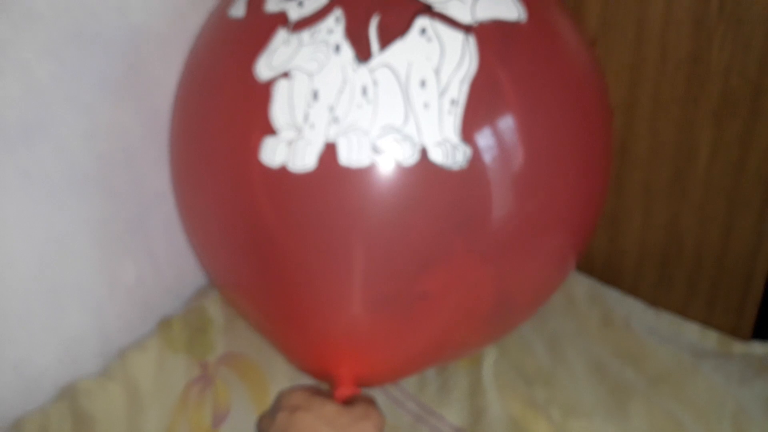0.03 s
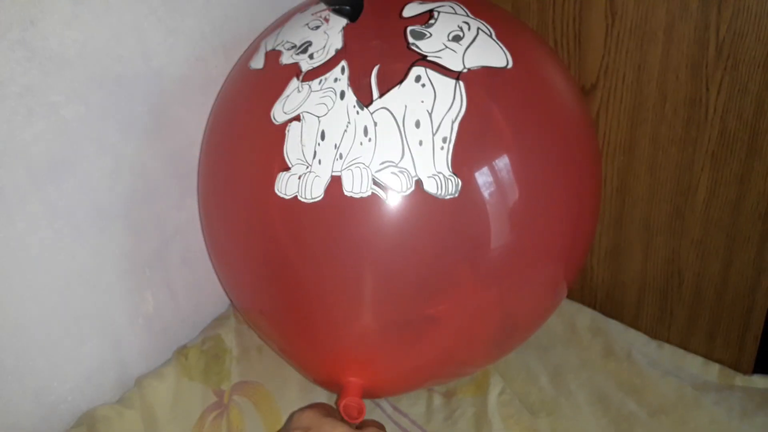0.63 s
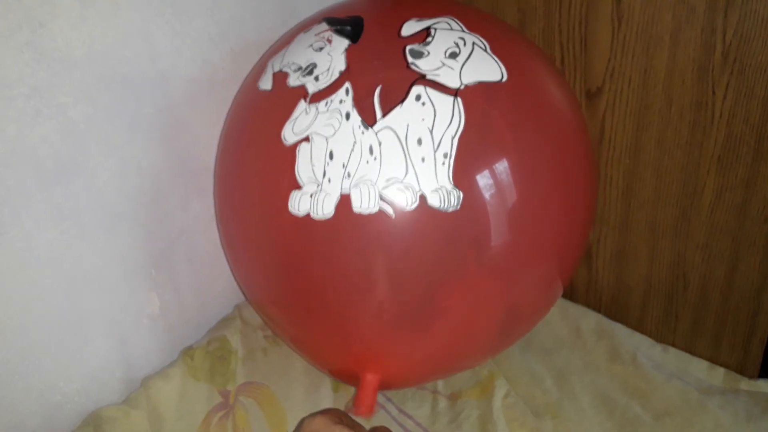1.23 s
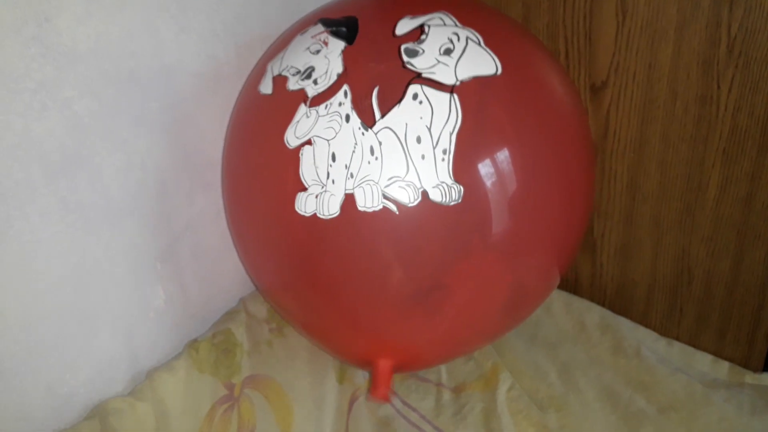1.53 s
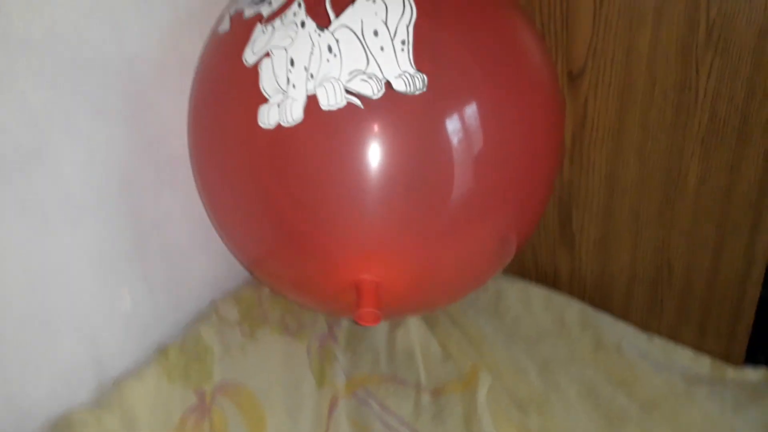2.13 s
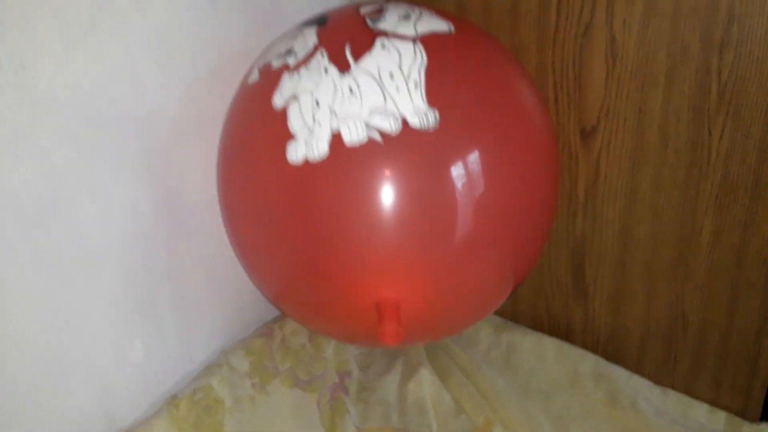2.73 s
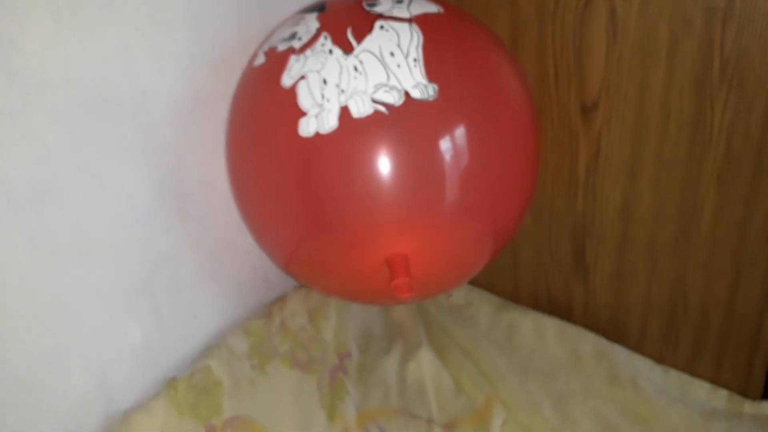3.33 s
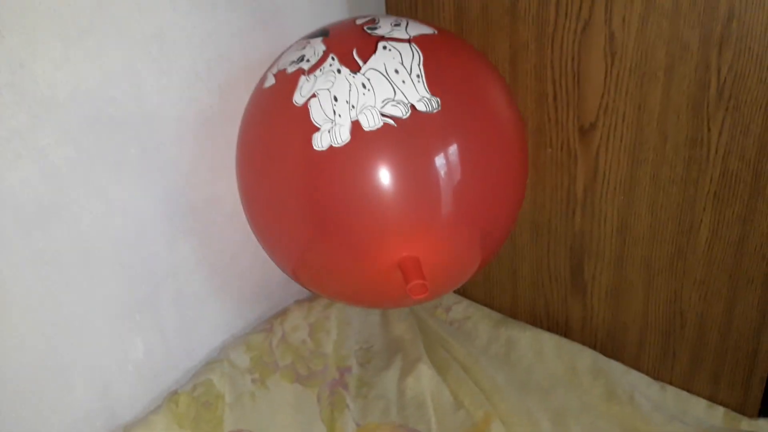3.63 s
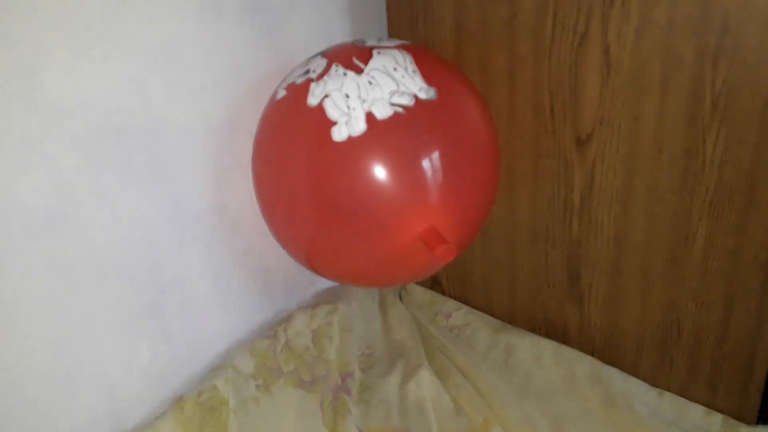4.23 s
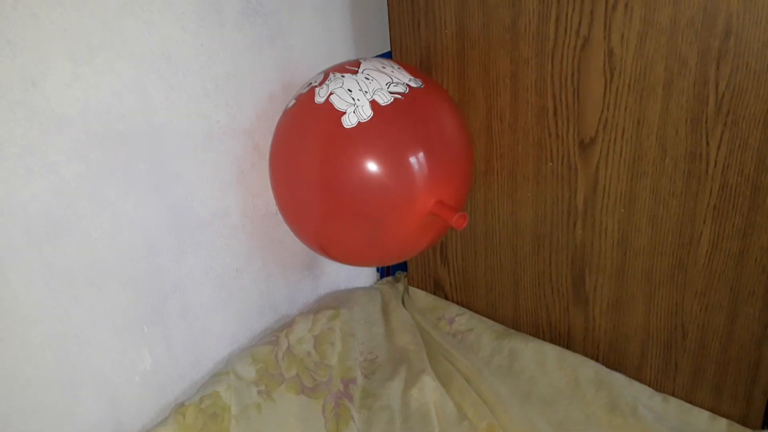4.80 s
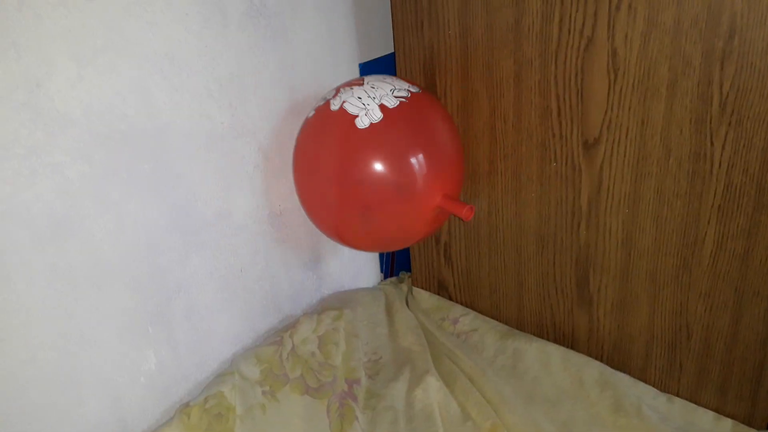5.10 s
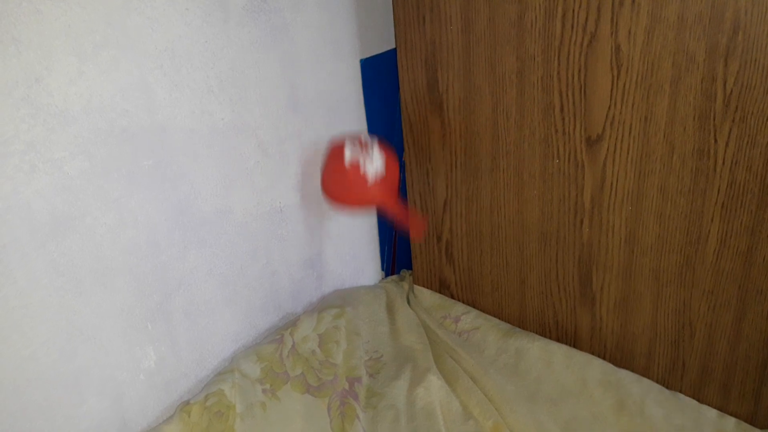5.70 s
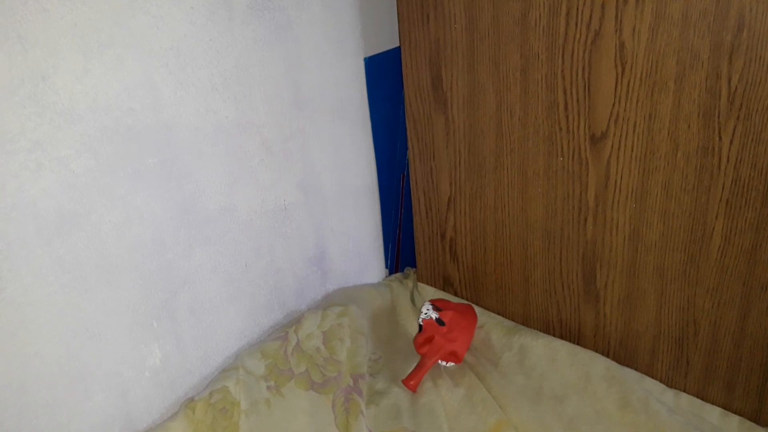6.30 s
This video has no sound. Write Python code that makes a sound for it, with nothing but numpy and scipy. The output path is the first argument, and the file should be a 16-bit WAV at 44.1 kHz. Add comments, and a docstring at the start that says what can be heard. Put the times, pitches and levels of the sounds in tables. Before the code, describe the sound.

A deflating balloon hisses, sputters with a low, booming flutter, then leaks softly and lands with a faint thump in a quiet room.

```python
"""A rubber balloon empties in the corner of a small, quiet room.
Air hisses through the pinched neck over low eddies, with a faint whistle off the lip now and then.
Let go at 0.9 s, the neck flaps, slaps and roars, shaking a boom out of the taut skin.
From 2.2 s it hangs slack and settles to a soft hiss. Near 5.7 s the last air leaves in a short
rush and a low puff, and the limp skin flops onto a bed."""
import sys
import numpy as np
from scipy import signal
from scipy.fft import rfft, irfft, next_fast_len
from scipy.io import wavfile
from scipy.ndimage import uniform_filter1d

SR = 44100
rng = np.random.default_rng(int(sys.argv[2]) if len(sys.argv) > 2 else 0)


def to_wav(s):
    """Save 16-bit WAV."""
    ch = np.atleast_2d(s).T  # columns
    pcm = np.round(np.clip(ch, -1, 1) * 32767)  # PCM
    wavfile.write(sys.argv[1], SR, pcm.astype(np.int16))


N = 288855

LET_GO_S, SETTLE_S, EMPTY_S = 0.916, 2.177, 5.65   # the neck starts to flap, goes slack, runs out of air
ATTACK_S, RELEASE_DB_PER_S = .025, 220   # how a stage of the flow sets in and dies

# Table levels are relative: each layer sets its own gain.
# broad rush of the tight jet: f/Hz, level/dB
RUSH_COLOUR = [(100, -13.5), (220, 2.5), (305, 7.5), (490, 0.5), (650, 2.5), (870, -0.5), (1130, -1),
               (1400, -2.5), (1750, -2.5), (2100, 0), (2450, 0.5), (3200, -4.5), (5000, -12.5), (9000, -30)]
# fine treble spray of the tight jet: f/Hz, level/dB
TIGHT_SPRAY_COLOUR = [(3000, -23), (5000, -1), (5700, -1), (6500, -1.5), (7600, 2.5), (8400, 3.5),
                      (9200, -3), (10200, -11.5), (12000, -12), (13800, -12), (16000, -17)]
# resonance of the pinched opening, sinking as the grip loosens: t/s, f/Hz
OPENING_GLIDE = [(.2, 2680), (.85, 2010), (1.05, 2330), (2.2, 2070)]
# resonance of the neck, sinking as the rubber relaxes: t/s, f/Hz
NECK_GLIDE = [(1.2, 4280), (2.0, 4040), (2.35, 3790), (5.2, 3604), (5.7, 3376)]
# the pinched neck's ring, weakening as the grip loosens: t/s, level/dB
PINCHED_RING_FADE = [(0, -32), (.27, -31.5), (.52, -39.5), (.92, -39.5)]
# eddies buffeting the skin by the pinched neck: f/Hz, level/dB
EDDY_COLOUR = [(25, -25), (55, -7.5), (90, -3), (130, -5), (200, -6.5), (400, -31)]
# gusts in the eddies and the draught: middle t/s, length/s, boost/dB
EDDY_GUSTS = [(.12, 0.069, 7), (.42, .07, 4.5), (2.33, .16, 6.5), (2.85, 0.12, 4.5), (3.52, 0.16, 5),
              (3.98, 0.42, 8), (5.68, 0.23, 11.5)]
# reflections from the corner and the room: delay/s, level/dB
WALL_ECHOES = [(.0031, -25.5), (.0053, -23), (.0089, -14.5), (0.0137, -17.5), (0.019, -15), (0.0264, -14.5),
               (0.0343, -26), (.0471, -25.5)]
# room tone, mostly lows: f/Hz, level/dB
ROOM_COLOUR = [(15, -53), (25, -21.5), (53, -8.5), (87, -2.5), (108, -2), (123, -6.5), (263, -16),
               (1160, -25), (7310, -35), (14800, -35.5), (16000, -41.5)]
# brief whistles of the lip: middle t/s, length/s, f/Hz, level/dB
LIP_WHISTLES = [(0.337, .11, 4340, -49), (0.839, 0.078, 2016, -38.5), (2.874, 0.079, 3724, -46.5),
                (3.036, .072, 3690, -48), (4.423, 0.064, 3770, -48), (4.528, .06, 3760, -46),
                (4.798, 0.1, 4110, -49), (5.67, 0.075, 4550, -59), (5.714, 0.063, 3250, -68)]
# how fast the free neck flaps: t/s, rate/Hz
FLAP_TEMPO = [(.93, 24.4), (1.53, 24.4), (1.62, 18.5), (1.74, 22), (1.88, 25), (1.94, 16), (2.18, 21)]
# how hard it flaps: t/s, level/dB
FLAP_VIGOUR = [(.93, 1), (1.25, -4), (1.57, -10.5), (2.2, -15.5)]
# surges of the jet through the flapping neck: middle t/s, length/s, boost/dB
JET_SURGES = [(1.595, .05, 4), (2.02, .08, 5)]
# hollow note of the taut skin, sinking as it slackens: t/s, f/Hz
BOOM_GLIDE = [(1.35, 250.5), (2.2, 220)]
# low body around that note: f/Hz, level/dB
BOOM_COLOUR = [(40, -29), (85, -8), (130, -3.5), (175, 5.5), (250, 4.5), (300, -5), (360, -14.5),
               (500, -10), (620, -15.5), (900, -31.5)]
# throbs and dips of the boom: middle t/s, length/s, boost/dB
BOOM_THROBS = [(.99, 0.059, 4), (1.168, 0.027, -6.5), (1.195, 0.013, 6), (1.27, 0.027, -5),
               (1.32, 0.058, 7), (1.383, .014, 3), (1.41, 0.029, -7), (1.455, .06, 3.5), (1.645, 0.022, -9),
               (1.744, 0.017, 6.5), (1.78, .04, 4.5), (1.925, 0.015, 4), (2.097, .025, -10),
               (2.195, .025, 5.5)]
# midrange rasp of the flapping neck: f/Hz, level/dB
RASP_COLOUR = [(300, -17), (450, -5), (620, -5.5), (790, 4), (1000, 4), (1220, -1.5), (1380, -11),
               (2000, -25), (4000, -46)]
# the neck's hardest slaps: t/s, level/dB
NECK_SLAPS = [(1.091, -14.5), (1.131, -17.5), (1.172, -15), (1.213, -20.5), (1.257, -14.5), (1.339, -17),
              (1.376, -19.5), (1.458, -19), (1.696, -27), (1.738, -28), (1.866, -24), (1.907, -27),
              (2.125, -30)]
# rubbery smack of a slap: f/Hz, level/dB
SMACK_COLOUR = [(400, -19.5), (620, -9), (800, 1), (1000, -0.5), (1200, -2.5), (1340, -11), (2000, -28.5)]
# bright spurt of air at a slap: f/Hz, level/dB
SPIT_COLOUR = [(1500, 5.5), (8000, 4.0), (11000, -3.5), (16000, -0.5)]
# envelope of the hiss through the relaxed neck: t/s, level/dB
SLACK_HISS_LEVEL = [(2.35, -45.5), (2.42, -46), (3.79, -51.5), (4.5, -50), (4.52, -47.5), (4.57, -48),
                    (5.25, -48.5), (5.55, -54)]
# tone of that hiss: f/Hz, level/dB
SLACK_HISS_COLOUR = [(300, -13), (580, -20), (800, -3.5), (980, -7.5), (1200, -20), (1550, -15.5),
                     (2100, -4.5), (2700, -2.5), (4200, 2.5), (5200, -4), (6600, -2), (8400, -4.5),
                     (10000, -18.5), (16000, -27)]
# narrow, half-whistled note of the lip: t/s, f/Hz
LIP_GLIDE = [(2.45, 4024), (3.1, 3600), (4.1, 3456), (4.55, 3690), (5.7, 3360)]
# broad spray of the slack jet, dipping, then growing as the balloon shrinks: t/s, level/dB
SLACK_SPRAY_LEVEL = [(2.4, -64.5), (3.36, -72.5), (4.65, -68), (4.97, -62.5), (5.49, -61.5), (5.64, -58)]
# tone of that spray: f/Hz, level/dB
SLACK_SPRAY_COLOUR = [(200, -14), (500, 4), (780, 14.5), (1000, 11), (1250, 5.5), (1900, 11), (3000, 11.5),
                      (5500, 9), (8300, 6), (10000, 1), (13500, 1.5), (16000, -4.5)]
# low breath of the draught and the last puff: f/Hz, level/dB
BREATH_COLOUR = [(25, -26), (55, -2.5), (110, 2), (220, -4), (330, -4), (450, -10.5), (650, -20.5),
                 (1200, -21)]
# folds of the empty skin landing: t/s, level/dB, crispness/dB, thud/dB
FOLD_HITS = [(5.899, -62, 12, -8), (5.91, -59, 0, 2), (5.919, -51.5, 3, 7), (5.927, -54, 9, 3),
             (5.948, -53, -3, 0), (5.961, -49.5, -14, -8), (5.973, -54, -16, -8), (6.011, -65, -15, -3),
             (6.034, -60, -16, -2)]
# modes of the limp skin: f/Hz, width/Hz, level/dB
SKIN_MODES = [(171.6, 77, -2), (310, 130, 2), (473, 60, -12), (700, 106, -8), (878, 210, -3),
              (1094, 110, -5.5), (2500, 280, -20.5), (8100, 1600, -25)]


def from_db(db):
    """Decibels to gain."""
    return 10 ** (np.asarray(db) / 20)


def rms_one(x):
    """Scale to unit power."""
    return x / np.sqrt(np.mean(x ** 2) + 1e-20)


def clock():
    """Time of each sample in seconds."""
    return np.arange(N) / SR


def curve(rows):
    """Breakpoints (t/s, value) joined by straight lines."""
    return np.interp(clock(), *np.transpose(rows))


def stage(start_s, end_s, release_db_per_s=RELEASE_DB_PER_S):
    """Attack, hold and release of one stage of the flow."""
    attack = np.clip((clock() - start_s) / ATTACK_S, 0, 1)
    return attack * from_db(-release_db_per_s * np.maximum(clock() - end_s, 0)) + 1e-12


def swell(middle_s, length_s):
    """A smooth rise and fall of height 1."""
    return np.exp(-np.minimum((2 * (clock() - middle_s) / length_s) ** 2, 50))


def gain_ride(rows):
    """Unity gain with a swell or dip for each row (middle t/s, length/s, boost/dB)."""
    return from_db(sum(db * swell(s, length_s) for s, length_s, db in rows))


def bursts(times, levels_db, rise_s, decay_s):
    """Envelope of short hits whose powers add."""
    power, age = np.zeros(N), clock()
    shape = (1 - np.exp(-age / rise_s)) * np.exp(-np.minimum(age / decay_s, 50))
    for s, db in zip(times, levels_db):
        at = int(s * SR)
        power[at:] += (from_db(db) * shape[:N - at] / shape.max()) ** 2
    return np.sqrt(power)


def noise(colour):
    """Noise shaped by rows (f/Hz, level/dB), rolling off beyond both ends; rms 1."""
    hz, db = np.transpose(colour)
    size = next_fast_len(N)
    f = np.maximum(np.fft.rfftfreq(size, 1 / SR), 1)
    eq = from_db(np.interp(np.log(f), np.log(hz), db))
    roll_off = np.minimum(f / hz[0], 1) ** 2 * np.minimum(hz[-1] / f, 1) ** 2
    return rms_one(irfft(rfft(rng.standard_normal(size)) * eq * roll_off, size)[:N])


def drift(rate_hz):
    """Smooth random modulation, mostly slower than `rate_hz`; rms 1."""
    hop = 40
    pole = np.exp(-2 * np.pi * rate_hz * hop / SR)
    slow = signal.lfilter([1], [1, -2 * pole, pole * pole], rng.standard_normal(N // hop + 502))[500:]
    return np.interp(np.arange(N) / hop, np.arange(len(slow)), rms_one(slow))


def resonator(hz, width_hz):
    """Coefficients of a two-pole resonance with unity peak gain."""
    r = np.exp(-np.pi * width_hz / SR)
    return (1 - r * r) / 2 * np.array([1, 0, -1]), [1, -2 * r * np.cos(2 * np.pi * hz / SR), r * r]


def gliding_ring(glide, width_hz, block=512):
    """Turbulence rings a resonance whose pitch follows rows (t/s, f/Hz); rms 1."""
    x, state = rng.standard_normal(N), np.zeros(4)
    s, hz = np.transpose(glide)
    for i in range(0, N, block):
        b, a = resonator(np.interp(i / SR, s, hz), width_hz)
        b, a = np.convolve(b, b), np.convolve(a, a)   # twice, for steep sides
        x[i:i + block], state = signal.lfilter(b, a, x[i:i + block], zi=state)
    return rms_one(x)


def wavering_sine(hz, waver_hz):
    """A tone whose pitch wanders at random; rms 1."""
    return np.sqrt(2) * np.sin(2 * np.pi * np.cumsum(hz + waver_hz * drift(44.5)) / SR)


def firm(x, samples):
    """A steadily driven vibration: its level is evened out over a short window."""
    return x / np.sqrt(uniform_filter1d(x ** 2, size=samples) + 1e-12)


def flap_envelope(db, follow, release_db_per_s=RELEASE_DB_PER_S):
    """Open while the neck flaps; the level takes the share `follow` of the vigour's dB."""
    return stage(LET_GO_S, SETTLE_S, release_db_per_s) * from_db(db + follow * curve(FLAP_VIGOUR))


def flap_tremolo(depth_db, lag_turns):
    """The free neck whips to and fro, sweeping its jet past once a flap."""
    start_s, end_s = FLAP_TEMPO[0][0], FLAP_TEMPO[-1][0]
    turns = np.cumsum(curve(FLAP_TEMPO) * (clock() > start_s)) / SR
    free = np.interp(clock(), [start_s - .02, start_s, end_s + .02, end_s + .05], [0, 1, 1, 0])
    depth = free * depth_db * np.log(10) / 20
    return np.exp(depth * np.cos(2 * np.pi * (turns - lag_turns))) / np.sqrt(1 + depth ** 2)


def tight_jet():
    """Air forced through the stretched neck, pinched and then free: rush, two rings and treble spray."""
    pinched = stage(-ATTACK_S, LET_GO_S)
    onset_db = 7.5 * np.exp(-clock() / .025)
    rush_level = np.hypot(pinched * from_db(-35 + onset_db), flap_envelope(-28, follow=.63))
    surging = flap_envelope(-30.5, follow=.3) * gain_ride(JET_SURGES)
    ring_level = np.hypot(pinched * from_db(curve(PINCHED_RING_FADE)), surging)
    spray_level = np.hypot(pinched * from_db(-31 - 10 * clock()), flap_envelope(-37, follow=.23))
    rush = from_db(2.5) * noise(RUSH_COLOUR) + from_db(-12) * gliding_ring(OPENING_GLIDE, width_hz=370)
    ring = from_db(1) * gliding_ring(NECK_GLIDE, width_hz=1300)
    body = (rush_level * rush + ring_level * ring) * flap_tremolo(depth_db=.75, lag_turns=.033)
    spray = spray_level * noise(TIGHT_SPRAY_COLOUR) * flap_tremolo(depth_db=1.27, lag_turns=.018)
    return (body + spray) * from_db(.87 * drift(50))


def eddies():
    """Eddies buffet the skin by the pinched neck: a gusty rumble that soon calms."""
    calm_s = .4
    strong = stage(-ATTACK_S, calm_s, release_db_per_s=69.5)
    calm = from_db(-14) * stage(calm_s, LET_GO_S)
    return (strong + calm) * gain_ride(EDDY_GUSTS) * from_db(-42.5 + 1.5 * drift(15)) * noise(EDDY_COLOUR)


def corner(x):
    """Nearby walls add echoes that comb the hiss at about the same power."""
    out = x.copy()
    for delay_s, db in WALL_ECHOES:
        lag = int(delay_s * SR)
        out[lag:] += from_db(db) * x[:-lag]
    return out / np.sqrt(1 + sum(from_db(db) ** 2 for _, db in WALL_ECHOES))


def room_tone():
    """The faint, low hush of the room under everything."""
    return from_db(-70.5) * noise(ROOM_COLOUR)


def whistles():
    """Now and then the jet locks to the lip and whistles faintly."""
    return sum(from_db(db) * swell(s, length_s) * wavering_sine(hz, waver_hz=45.4)
               for s, length_s, hz, db in LIP_WHISTLES)


def flapping_neck():
    """The whipping neck rasps and shakes the taut skin into a lumpy boom."""
    boom_level = flap_envelope(-22.5, follow=.14, release_db_per_s=201) * gain_ride(BOOM_THROBS)
    hollow_note = firm(gliding_ring(BOOM_GLIDE, width_hz=76), samples=1100)
    skin = hollow_note + from_db(-2.5) * noise(BOOM_COLOUR)
    boom = boom_level * skin * flap_tremolo(depth_db=.9, lag_turns=.25)
    rasp = flap_envelope(-28, follow=.9) * noise(RASP_COLOUR)
    return boom + rasp


def slaps():
    """The neck's hardest slaps smack, each chopping off a bright spurt of air."""
    times, slap_db = np.transpose(NECK_SLAPS)
    smack = firm(noise(SMACK_COLOUR), samples=330) * bursts(times, slap_db, rise_s=.002, decay_s=.006)
    spit = noise(SPIT_COLOUR) * bursts(times, np.zeros(len(times)), rise_s=.0006, decay_s=.005)
    return from_db(-3.5) * smack + from_db(-36.5) * spit


def slack_jet():
    """The open neck hisses softly round a wandering note; the sound broadens as the balloon shrinks."""
    neck = from_db(-2.5) * gliding_ring(NECK_GLIDE, width_hz=1100)
    lip = from_db(-6.5) * gliding_ring(LIP_GLIDE, width_hz=220)
    air = from_db(-3) * noise(SLACK_HISS_COLOUR)
    hiss = from_db(curve(SLACK_HISS_LEVEL)) * (neck + lip + air)
    spray = from_db(11.5 + curve(SLACK_SPRAY_LEVEL)) * noise(SLACK_SPRAY_COLOUR)
    return stage(SETTLE_S, EMPTY_S, release_db_per_s=274) * (hiss + spray) * from_db(.5 * drift(25))


def draught():
    """The slack neck breathes a low, gusty draught that dies down."""
    level_db = -56.5 - 4.5 * (clock() - SETTLE_S) + 1.1 * drift(20)
    return stage(SETTLE_S, end_s=5.85) * gain_ride(EDDY_GUSTS) * from_db(level_db) * noise(BREATH_COLOUR)


def last_puff():
    """The skin folds in and pushes out the rest of the air with a low, breathy, falling note."""
    middle_s = 5.672
    pitch_hz = 141 - 400 * (clock() - middle_s)
    note = wavering_sine(pitch_hz, waver_hz=18.8) * from_db(2.6 * drift(40))
    breath = from_db(-2.5) * noise(BREATH_COLOUR)
    return from_db(-55.5) * swell(middle_s, length_s=.11) * (note + breath)


def landing():
    """Fold after fold of soft rubber flops on the cloth; the first touches are the crispest."""
    times, fold_db, crisp_db, thud_db = np.transpose(FOLD_HITS)
    out = np.zeros(N)
    for hz, width_hz, db in SKIN_MODES:
        hit_db = fold_db + crisp_db * (hz > 2000) + thud_db * (hz < 250)
        hits = bursts(times, hit_db, rise_s=.00062, decay_s=.0061)
        room_tail = from_db(-6.5) * bursts(times, hit_db, rise_s=.008, decay_s=.053 * min(1, 900 / hz))
        band = np.concatenate(resonator(hz, width_hz))
        mode = rms_one(signal.sosfilt([band, band], rng.standard_normal(N)))
        out += from_db(db) * (hits + room_tail) * mode
    return from_db(-6.5) * out


def scene():
    """The balloon in its corner over the room tone, in mono."""
    hiss = corner(tight_jet() + slack_jet()) + whistles()
    rubber = flapping_neck() + slaps() + last_puff() + landing()
    return (hiss + rubber + eddies() + draught() + room_tone())[None]


def record(dry):
    """The microphone loses the deepest bass; the top is cut steeply."""
    low_cut_hz, high_cut_hz = 19, 15800
    thinned = signal.sosfilt(signal.butter(2, low_cut_hz, "high", fs=SR, output="sos"), dry)
    return signal.sosfilt(signal.ellip(12, .1, 90, high_cut_hz, fs=SR, output="sos"), thinned)


dry = scene()
out = record(dry)
to_wav(out)
```